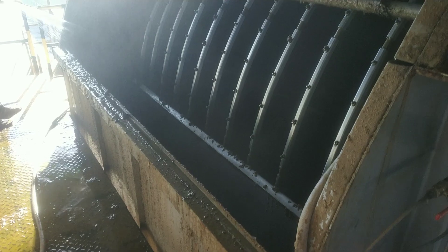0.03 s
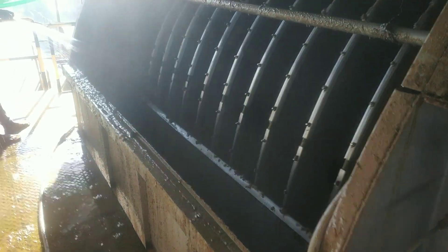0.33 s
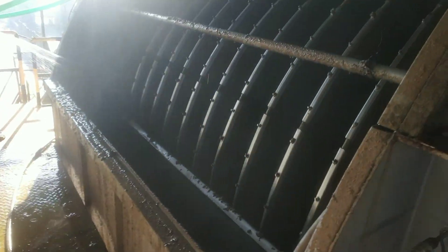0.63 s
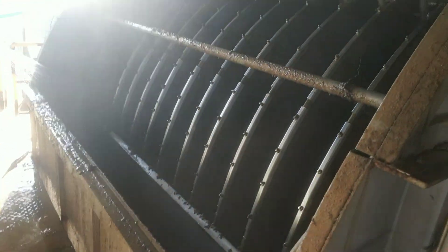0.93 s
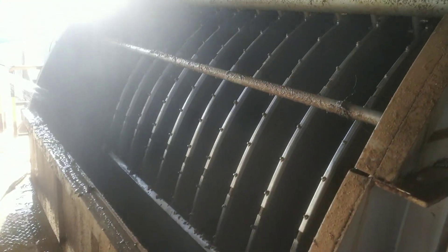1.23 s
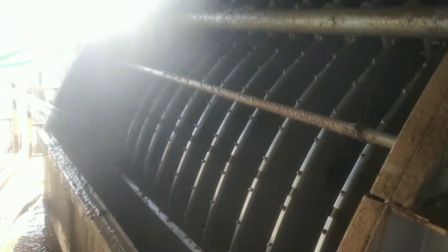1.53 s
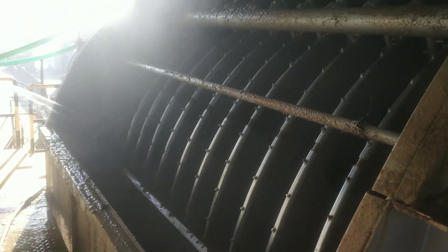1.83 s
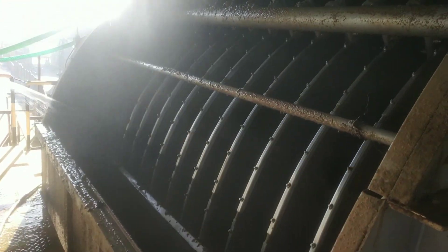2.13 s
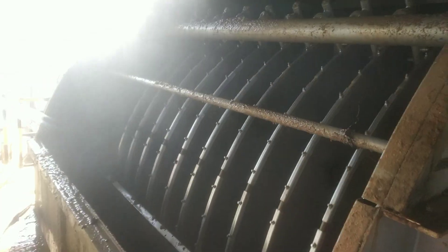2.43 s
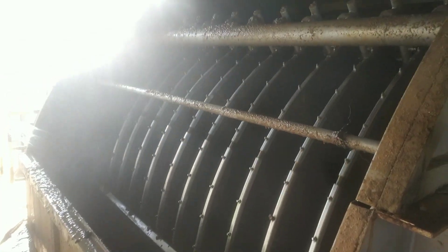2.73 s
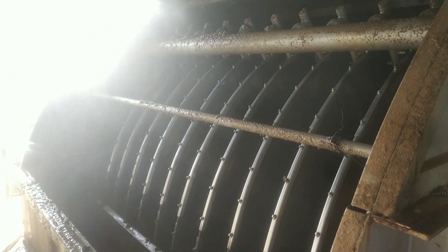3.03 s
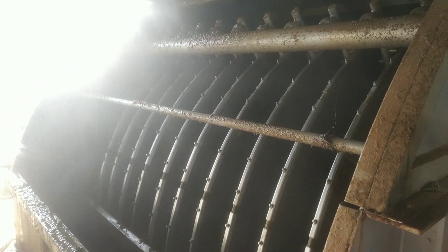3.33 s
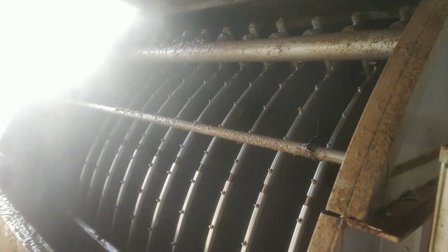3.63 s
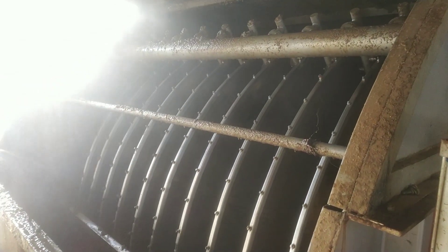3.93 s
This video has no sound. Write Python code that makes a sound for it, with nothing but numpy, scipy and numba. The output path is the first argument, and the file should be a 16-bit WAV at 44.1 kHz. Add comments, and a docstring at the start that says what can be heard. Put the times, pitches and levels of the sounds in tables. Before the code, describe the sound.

Heavy rotating machinery runs at arm's length in a mill, with a deep roar, a droning hum and bright, constant water spray. Gears whine in swells, and a few thin metallic squeaks appear briefly as it keeps running.

```python
"""A big ribbed drum turns under water showers in a paper mill, an arm's length away.
The sound cuts in at once: the hall roars, drum and vat rumble, the drive hums, the spray hisses.
The gear whine comes and goes, and a bright patch in the hiss slides upwards as the listener moves
along the machine. Between about 2.4 and 3 seconds, four thin squeaks peek out of the spray.
The machine runs on to the end. Both ears hear the same sound."""
import sys
import numpy as np
from scipy import signal
from scipy.fft import rfft, irfft
from scipy.io import wavfile
from numba import njit

SR = 44100
rng = np.random.default_rng(int(sys.argv[2]) if len(sys.argv) > 2 else 0)


def dump(signal):
    """Clip the signal to [-1, 1] and save it as 16-bit WAV at the path in sys.argv[1]."""
    limited = np.clip(np.atleast_2d(signal).T, -1, 1)
    pcm = np.round(limited * 32767).astype(np.int16)
    wavfile.write(sys.argv[1], SR, pcm)


N = 176400  # 4 seconds

# How the hall's roar is spread from low to high: pitch_hz, relative_db
HALL_SPECTRUM = [(25, -61), (60, -41), (80, -37), (105, -21), (150, -10.5), (200, -2.5), (300, -7),
                 (400, -9), (520, -14.5), (680, -16.5), (900, -22), (1400, -26), (3000, -33)]
# Thin metallic squeaks: middle_s, length_s, pitch_hz, loudest_db
SQUEAK_NOTES = [(2.44, .09, 4630, -42), (2.56, .14, 4455, -40), (2.82, .19, 4615, -41),
                (2.95, .16, 4448, -38.5)]
# Humming and singing tones of the drive: pitch_hz, level_db, waver_share
DRIVE_TONES = [(114.2, -50, .25), (197.3, -36.5, .35), (208, -33.5, .22), (216, -36, .35),
               (228.5, -32.7, .3), (268.5, -38.5, .35), (311, -31.8, .2), (321, -35, .2), (331, -43, .3),
               (342.6, -43, .25), (582.8, -46.5, .3), (748, -53, .6), (1264, -56, .5), (2528, -50, .4),
               (4446, -54.5, .5)]
# Tones of the meshing gear teeth: pitch_hz, level_db, waver_share
GEAR_TONES = [(1896, -45, .38), (1934.3, -49.5, .6)]
# How the gear whine rises and falls: time_s, relative_db
WHINE_SWELL = [(.12, 3), (.45, 3), (.56, 6), (.68, -2), (1.05, -1), (1.17, 7), (1.45, -6.5), (2.1, -4.5),
               (2.3, -1.5), (2.58, 5.5), (2.87, -1), (3.1, 6.5), (3.27, -1.5), (3.55, -3), (3.85, 2),
               (4, -1)]
# Pitches at which drum and vat ring: pitch_hz, width_hz, level_db
DRUM_RESONANCES = [(185, 15, -36), (206.8, 23.4, -33), (231, 27, -35), (263.6, 21.3, -32.5),
                   (298, 18, -36.5), (361.5, 7.2, -41.5)]
# How the rumble rises and falls: time_s, relative_db
RUMBLE_SWELL = [(.15, 1), (.38, 0), (.47, -2), (.69, 2), (.9, -1), (1.3, -1), (1.42, -2.5), (1.66, -1.5),
                (2.35, -0.9), (2.5, -0.6), (2.72, 1), (3.03, -3.5), (3.28, 1), (3.46, -2.5), (3.55, .6),
                (3.8, -0.5), (4, -2)]
# How the spray's hiss is spread from low to high: pitch_hz, relative_db
SPRAY_SPECTRUM = [(300, -31), (800, -12), (1300, -8.5), (2000, -5), (2800, -4), (4500, -3.5), (6000, 0),
                  (7400, 0), (8500, -3.5), (10000, -9.5), (12000, -16), (14000, -17)]
# A mostly bright patch that slides up through the hiss: time_s, pitch_hz, gain_db
HISS_PEAK = [(.1, 1620, 5.5), (.8, 2260, -3.5), (1.2, 2800, 3), (1.42, 3020, 3.5), (1.6, 3900, 5),
             (1.82, 3960, 5), (2.15, 4200, 1.5), (2.85, 5250, 3), (3.3, 5100, 3), (4, 5170, 5)]
# A dull patch that slides through the hiss: time_s, pitch_hz, gain_db
HISS_DIP = [(.1, 3900, -3), (.35, 3900, -2.5), (.44, 3900, -8), (.53, 4220, -9), (.61, 4750, -13),
            (.69, 4840, -4), (1.3, 5430, -3.5), (1.55, 5300, -2.5)]
# A sizzle that drifts about high in the hiss: time_s, pitch_hz, gain_db
HISS_SIZZLE = [(.1, 8040, 1), (.3, 7900, 2), (.47, 7260, 5.5), (.68, 7360, 0), (.88, 6800, 1.5),
               (1.1, 7240, 5.5), (1.48, 7460, 4), (1.62, 6950, 1.5), (1.78, 7700, -3), (2.07, 7650, 2),
               (2.3, 7400, 1), (2.8, 7400, -0.7), (4, 7360, -1)]
# How the lower hiss rises and falls: time_s, gain_db
LOW_HISS_GAIN = [(.4, 0), (.8, 5.5), (1.45, 1), (1.7, -2.5), (2, -2.5), (2.4, 0), (4, 0.8)]
# How the very highest hiss rises and falls: time_s, gain_db
TREBLE_GAIN = [(.1, 0), (.45, -2.5), (.72, 2.5), (.97, -8), (1.38, -6), (1.57, 2.5), (2.05, 5.5),
               (2.45, 4.5), (2.7, 1), (3.3, 0), (4, 3)]


def undb(db):
    """Turn decibels into a number to multiply by."""
    return 10 ** (np.asarray(db) / 20)


def level(x, db):
    """Set the average (rms) level of a sound."""
    return x * undb(db) / np.sqrt(np.mean(x ** 2))


def curves(table):
    """Join a timed table's rows with straight lines, one curve for each column after the time."""
    times, *columns = np.array(table, float).T
    return [np.interp(np.arange(N) / SR, times, column) for column in columns]


def swell(table):
    """A level curve in dB above and below its own average."""
    db = curves(table)[0]
    return db - db.mean()


def colour(x, spectrum):
    """Make each pitch louder or softer, following a spectrum table."""
    hz, db = np.array(spectrum, float).T
    bin_hz = np.maximum(np.fft.rfftfreq(N, 1 / SR), 1)
    gain_db = np.interp(np.log(bin_hz), np.log(hz), db)
    return irfft(rfft(x) * undb(gain_db), N)


def wobble(rate_hz):
    """A smooth random curve of typical size 1 that moves about rate_hz times a second."""
    bin_hz = np.fft.rfftfreq(N, 1 / SR)
    keep_slow = np.exp(-(bin_hz / rate_hz) ** 2) * (bin_hz > 0)
    return level(irfft(rfft(rng.standard_normal(N)) * keep_slow, N), 0)


@njit
def moving_band(x, hz, width_hz):
    """A state-variable filter: it lets one band through, and the band may move at every sample."""
    out, band_state, low_state = np.empty(len(x)), 0., 0.
    for i in range(len(x)):
        tuning, damping = np.tan(np.pi * hz[i] / SR), width_hz[i] / hz[i]
        passed = (band_state + tuning * (x[i] - low_state)) / (1 + tuning * (tuning + damping))
        band_state = 2 * passed - band_state
        low_state += 2 * tuning * passed
        out[i] = damping * passed
    return out


def band(x, hz, width_hz):
    """Keep the pitches around hz; the settings may be numbers or curves."""
    return moving_band(x, hz * np.ones(N), width_hz * np.ones(N))


def bell(x, hz, width_hz, db):
    """Make one band louder or softer."""
    return x + (undb(db) - 1) * band(x, hz, width_hz)


def ring(hz, width_hz):
    """Something shaken at random rings near its own pitch."""
    wider_hz = width_hz * np.pi / 2  # filtering twice narrows the band again
    return band(band(rng.standard_normal(N), hz, wider_hz), hz, wider_hz)


def tones(table, clock):
    """Pure tones on a shared clock, each wavering in level and phase."""
    out = 0
    for hz, db, waver in table:
        phase = 2 * np.pi * (hz * clock + rng.random())
        tone = (1 + waver * wobble(5.4)) * np.sin(phase)
        tone += waver * wobble(5.4) * np.cos(phase)
        out += level(tone, db)
    return out


def hall_roar():
    """The machine hall fills the background with a deep, slightly fluttering noise."""
    roar = colour(rng.standard_normal(N), HALL_SPECTRUM)
    return level(roar * undb(1.13 * wobble(28)), db=-26)


def squeaks():
    """Thin metallic notes swell out of the spray and sink back."""
    t, out = np.arange(N) / SR, 0
    for middle_s, length_s, hz, db in SQUEAK_NOTES:
        arch = np.cos(np.pi * np.clip((t - middle_s) / length_s, -.5, .5))
        wavering_hz = hz + 8.7 * wobble(30)
        phase = 2 * np.pi * np.cumsum(wavering_hz) / SR
        out += arch * level(np.sin(phase), db)
    return out


def drive(shaft_hz=20.1):
    """The drive hums and its gears whine; the gear case rings harder once per shaft turn."""
    clock = np.cumsum(1 + 0.00086 * wobble(5.1)) / SR  # all tones drift in pitch together
    throb = 1 + 0.64 * np.sin(2 * np.pi * shaft_hz * clock)
    teeth = tones(GEAR_TONES, clock)
    gear_case = level(ring(hz=1940, width_hz=93) * throb, db=-45.5)
    whine = (teeth + gear_case) * undb(swell(WHINE_SWELL))
    return tones(DRIVE_TONES, clock) + whine


def drum():
    """Churning paper pulp shakes the drum and its vat, so they rumble."""
    return sum(level(ring(hz, width_hz), db) for hz, width_hz, db in DRUM_RESONANCES)


def spray(drops_per_s=3000):
    """Water jets hiss and a crowd of tiny drops strikes the drum."""
    mist = rng.standard_normal(N)
    size_db = 3.5 * np.minimum(rng.exponential(size=N), 5)  # many small drops, few big ones
    clicks = undb(size_db) * rng.choice([-1, 1], N)
    drop_lands = rng.random(N) < drops_per_s / SR
    drops = level(clicks * drop_lands, 0)
    hiss = colour(mist + 0.37 * drops, SPRAY_SPECTRUM)
    return level(hiss * undb(0.73 * wobble(29)), db=-24)  # with a slight flicker


def move_along_spray(hiss, treble_hz=9900):
    """Bright and dull patches slide through the hiss as the listener moves."""
    peak_hz, peak_db = curves(HISS_PEAK)
    hiss = bell(hiss, peak_hz, width_hz=0.33 * peak_hz, db=peak_db)
    dip_hz, dip_db = curves(HISS_DIP)
    hiss = bell(hiss, dip_hz, width_hz=0.4 * dip_hz, db=dip_db)
    sizzle_hz, sizzle_db = curves(HISS_SIZZLE)
    hiss = bell(hiss, sizzle_hz, width_hz=1400, db=sizzle_db)
    hiss = bell(hiss, hz=2420, width_hz=600, db=curves(LOW_HISS_GAIN)[0])
    treble = signal.sosfiltfilt(signal.butter(4, treble_hz, "high", fs=SR, output="sos"), hiss)
    return hiss + (undb(curves(TREBLE_GAIN)[0]) - 1) * treble


def scene():
    """The low sounds of hall, drum and drive swell together under the spray and squeaks."""
    machine = hall_roar() + drum() + drive()
    machine = bell(machine, hz=245, width_hz=380, db=swell(RUMBLE_SWELL))
    mix = machine + move_along_spray(spray()) + squeaks()
    return np.array([mix, mix])


def record(dry, start_s=0.081, top_hz=13880):
    """The sound starts suddenly, and its very highest pitches are cut away."""
    started = np.arange(N) / SR >= start_s
    steep_lowpass = signal.ellip(12, .1, 80, top_hz, fs=SR, output="sos")
    return signal.sosfilt(steep_lowpass, dry * started)


dry = scene()
out = record(dry)
dump(out)
```